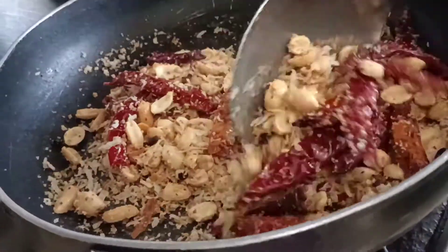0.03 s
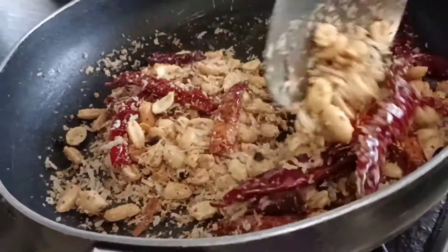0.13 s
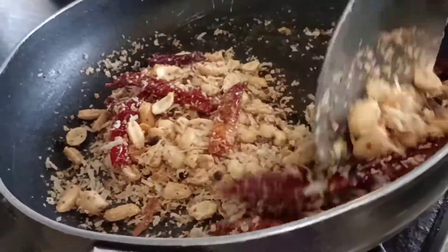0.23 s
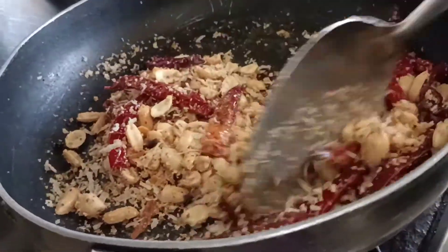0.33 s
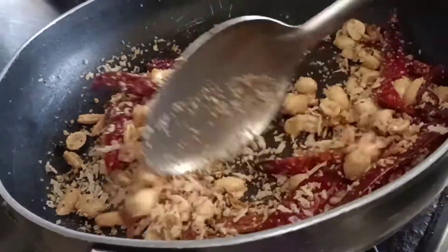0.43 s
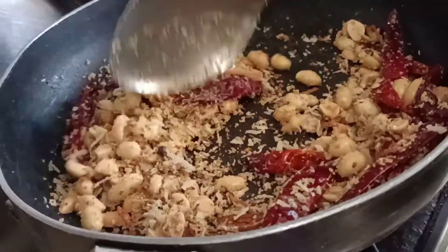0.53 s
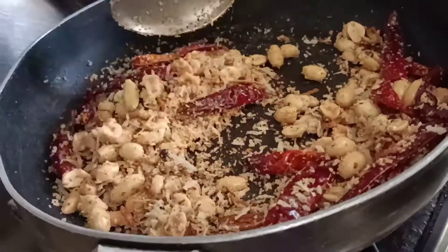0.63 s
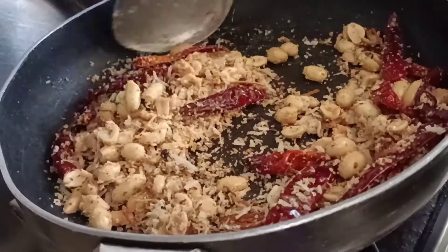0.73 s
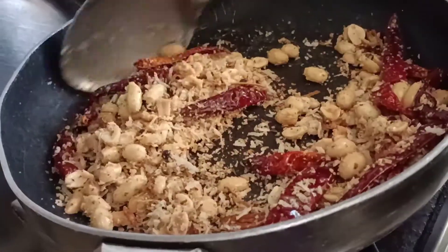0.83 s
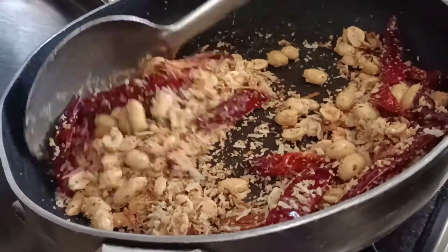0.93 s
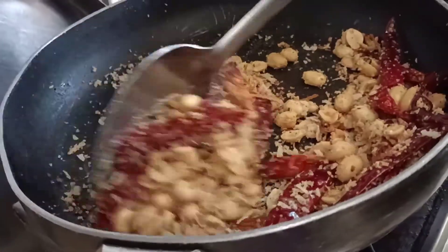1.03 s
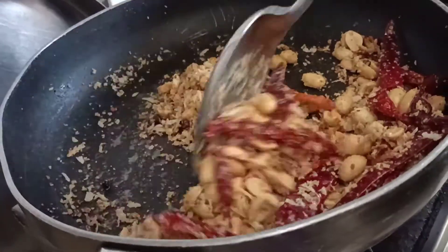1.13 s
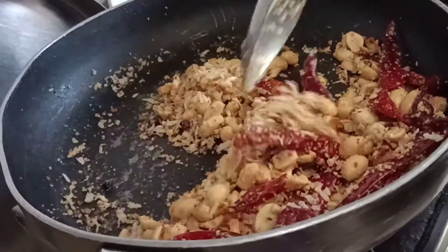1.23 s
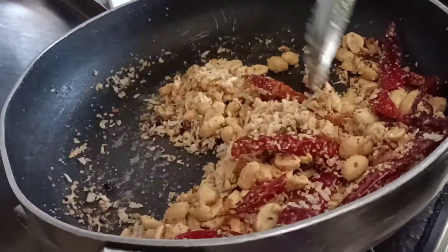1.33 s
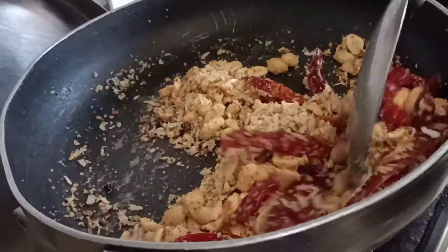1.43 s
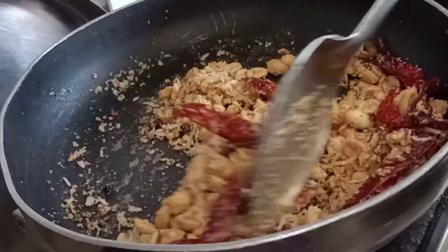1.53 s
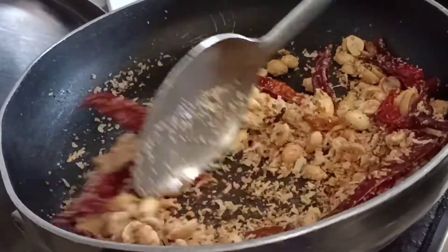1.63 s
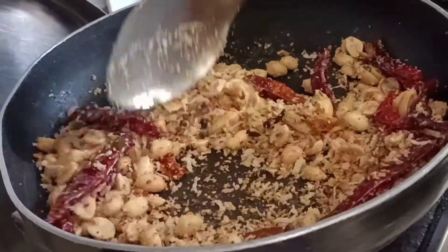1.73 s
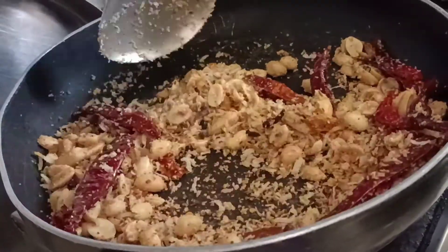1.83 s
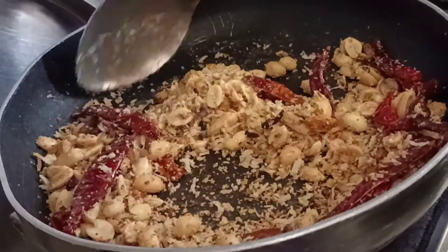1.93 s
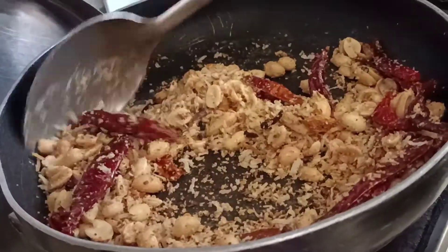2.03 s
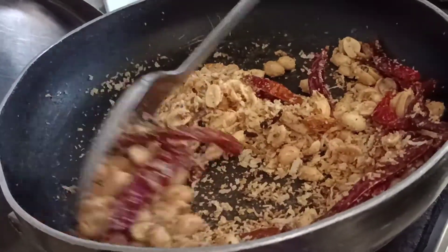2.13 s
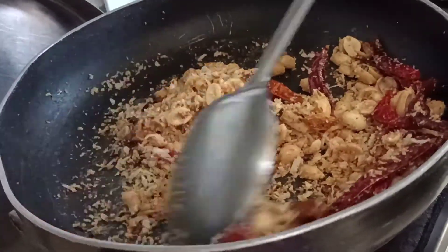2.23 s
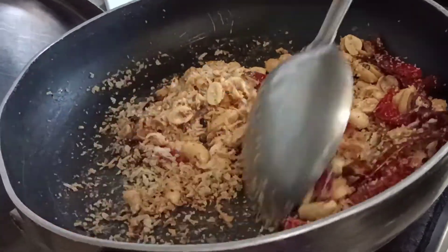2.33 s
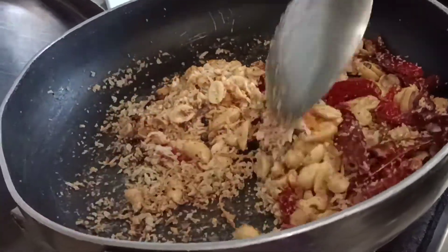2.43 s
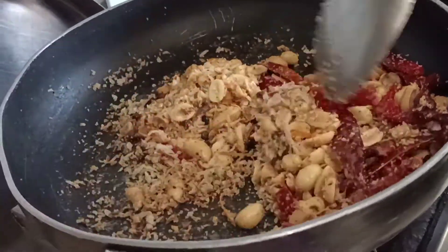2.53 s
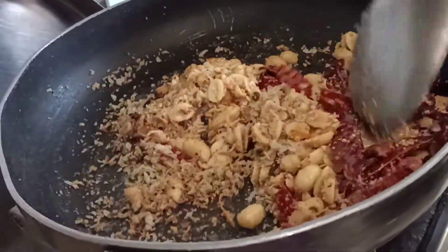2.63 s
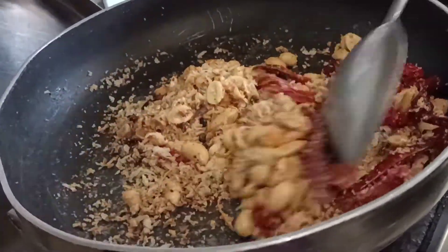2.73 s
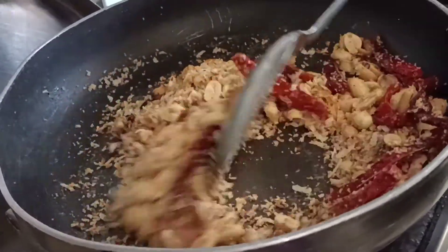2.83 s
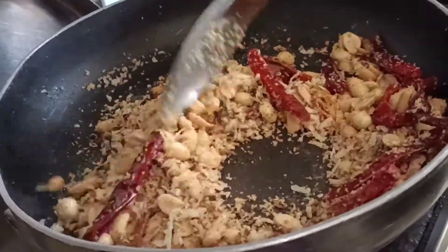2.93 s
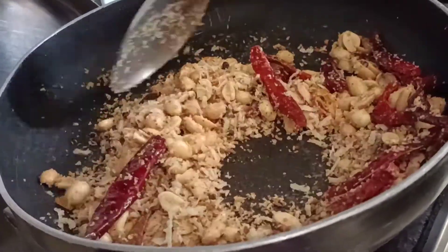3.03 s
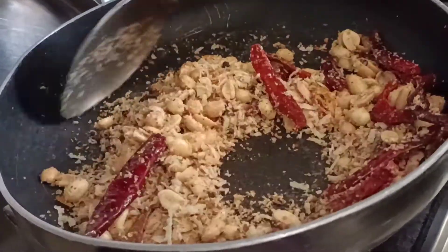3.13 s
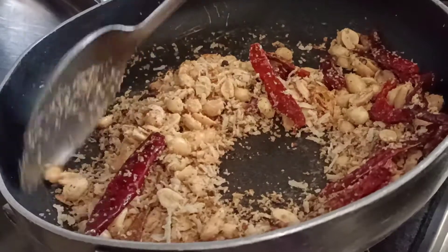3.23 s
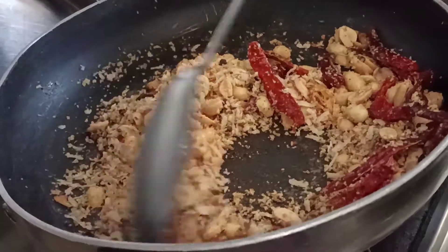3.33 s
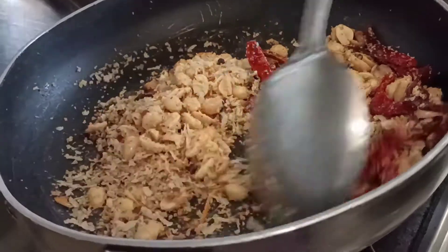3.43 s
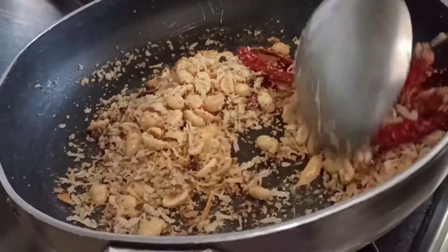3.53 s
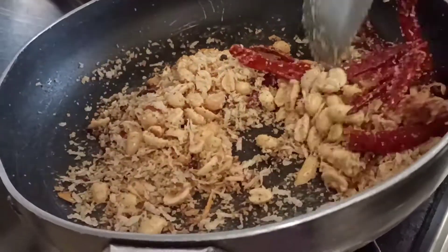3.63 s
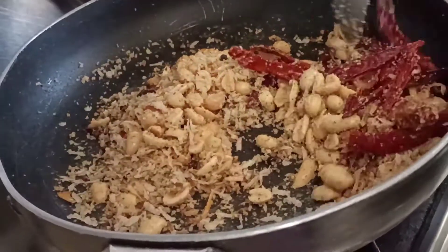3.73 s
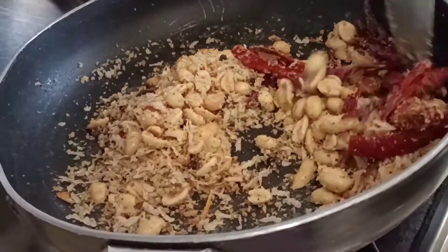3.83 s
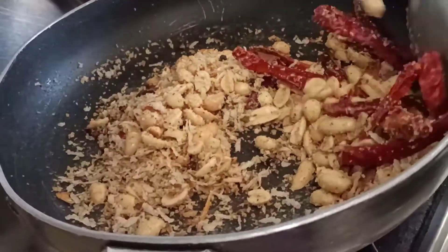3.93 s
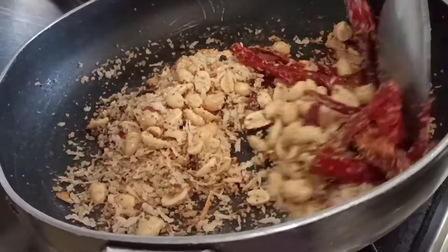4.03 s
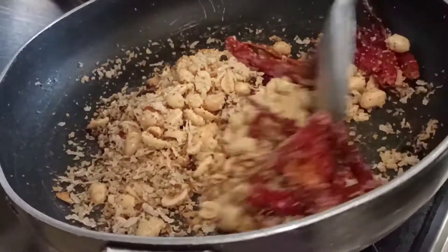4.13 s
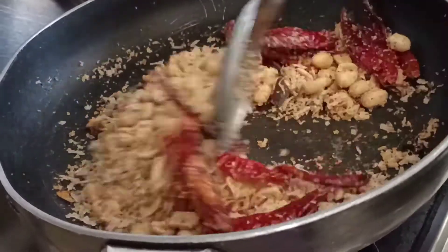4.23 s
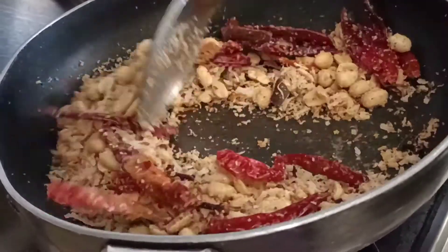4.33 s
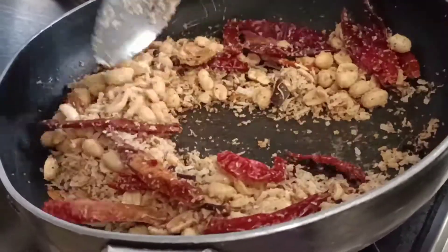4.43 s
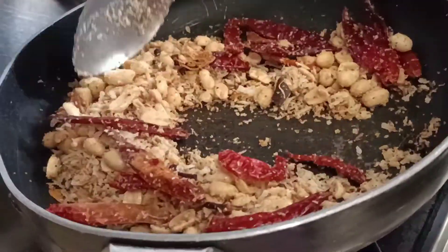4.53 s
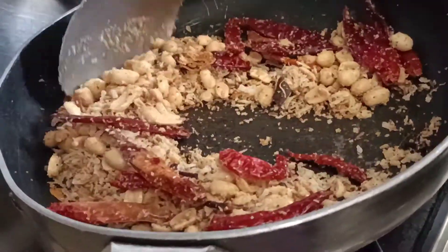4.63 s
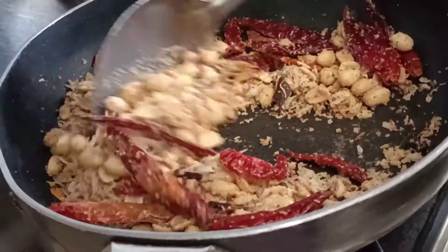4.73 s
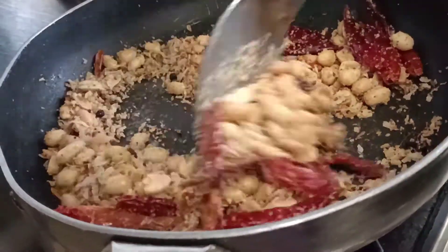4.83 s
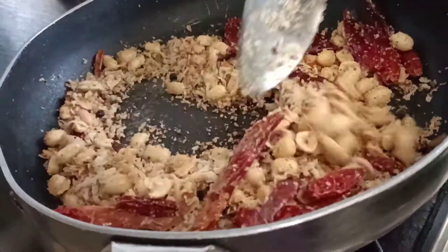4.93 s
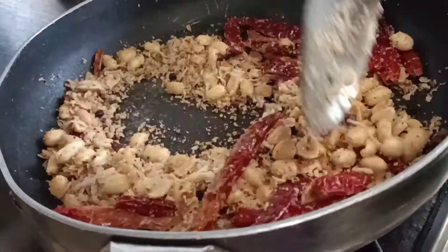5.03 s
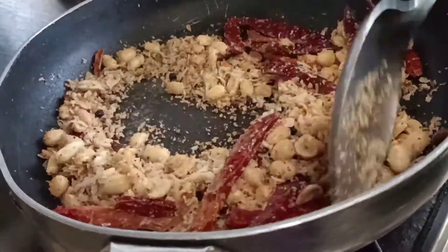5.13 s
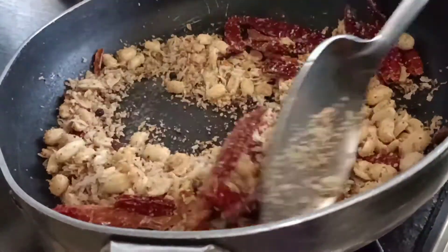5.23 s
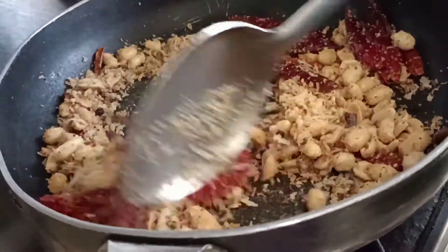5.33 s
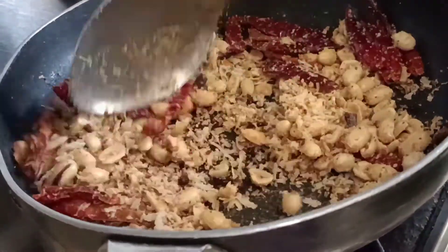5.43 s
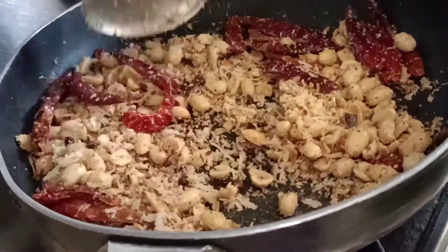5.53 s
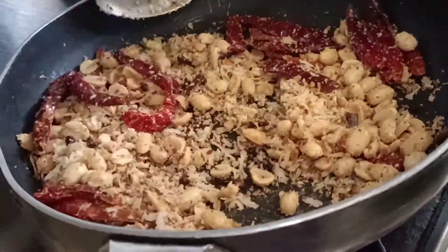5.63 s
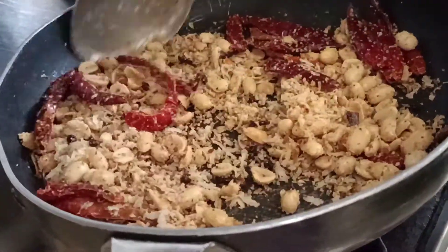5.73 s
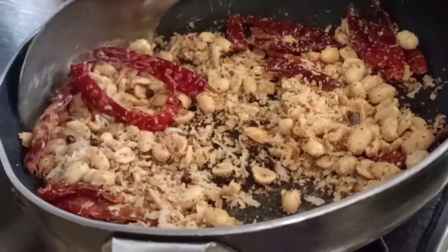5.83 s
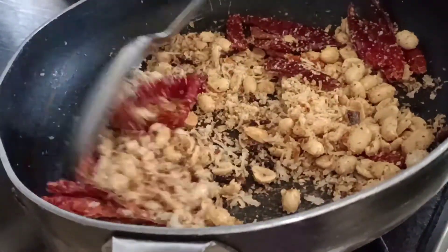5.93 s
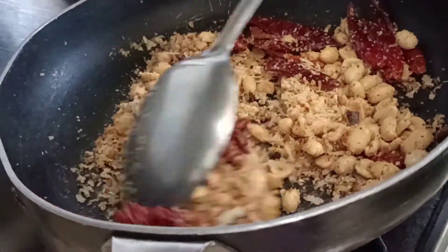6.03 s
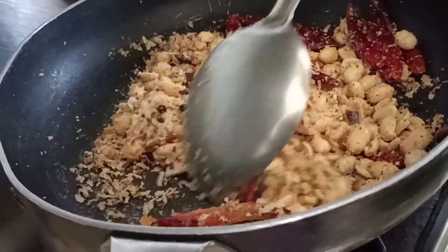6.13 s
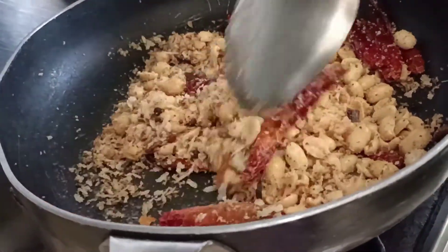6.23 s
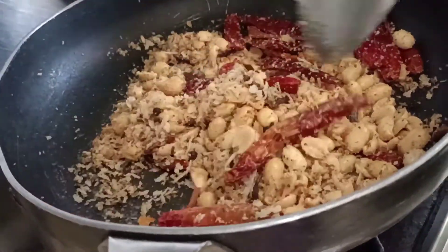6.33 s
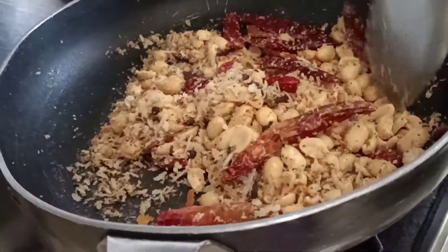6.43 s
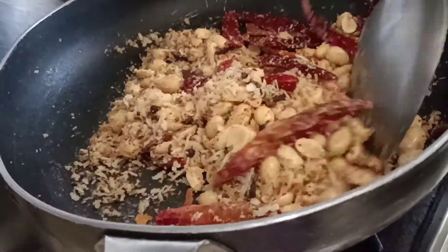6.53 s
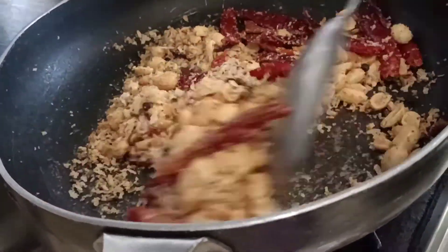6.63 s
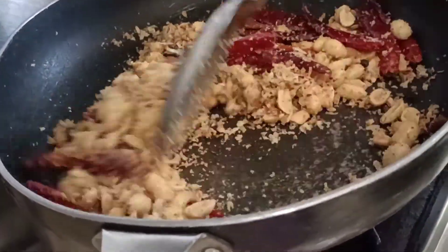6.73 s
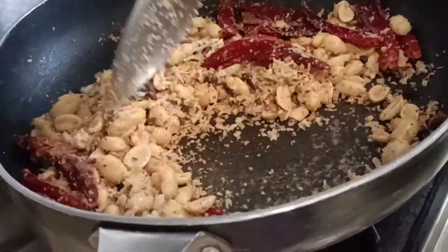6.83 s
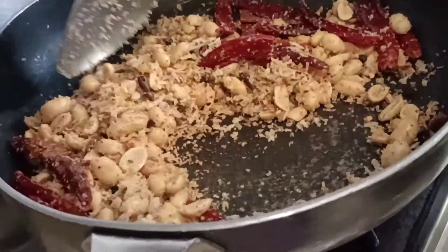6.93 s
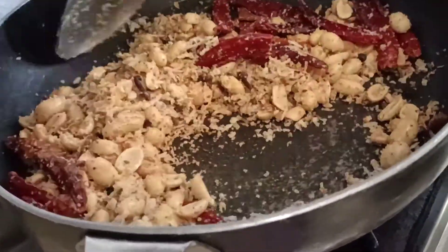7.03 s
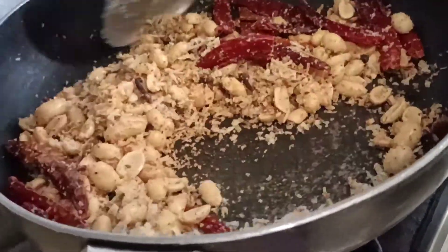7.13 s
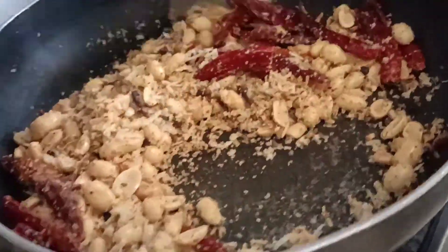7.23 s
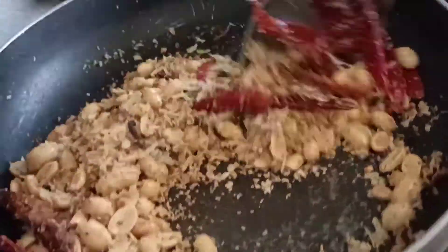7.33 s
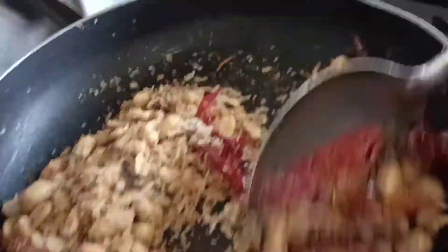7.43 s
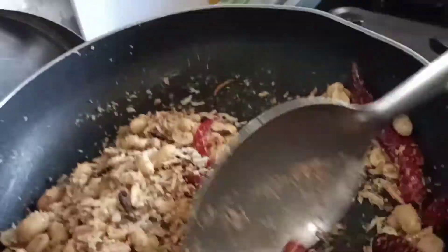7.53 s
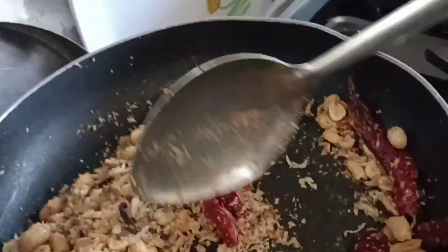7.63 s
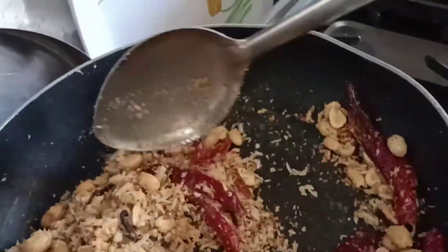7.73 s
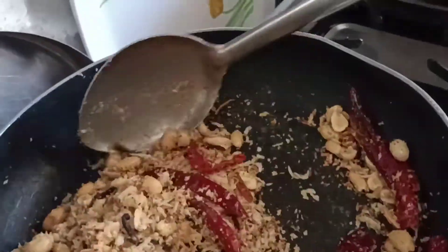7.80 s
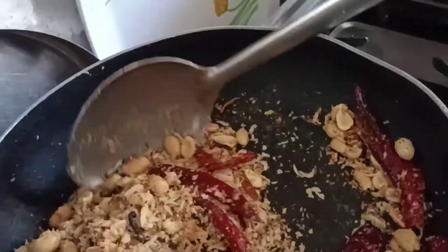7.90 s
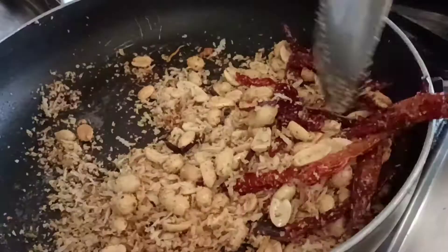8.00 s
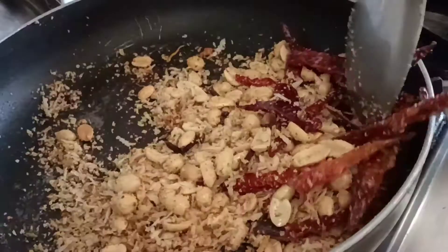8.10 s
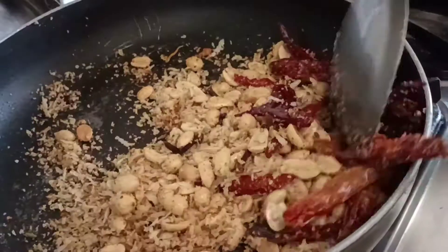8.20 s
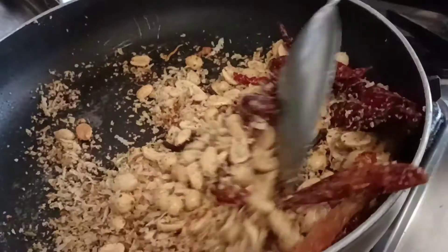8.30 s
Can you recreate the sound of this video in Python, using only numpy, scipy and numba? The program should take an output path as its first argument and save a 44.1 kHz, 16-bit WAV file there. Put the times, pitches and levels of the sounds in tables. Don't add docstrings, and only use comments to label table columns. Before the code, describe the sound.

A steel spoon stirs dry shredded coconut, nuts and crisp chillies in a nonstick pan on a stove. Short rough scrapes and dull metallic clanks alternate with softer rustling pushes and small nut ticks. Strokes are uneven with brief near-quiet gaps; the hardest knocks come around 3.5, 7, 7.7 and 8.3 seconds. Close stereo phone pickup in a small tiled kitchen, short dull reflections, very faint flame hiss.

```python
import sys
import numpy as np
from scipy import signal
from scipy.fft import rfft, irfft, next_fast_len
from scipy.io import wavfile
from scipy.ndimage import uniform_filter1d, minimum_filter1d
from numba import njit

SR = 44100
rng = np.random.default_rng(int(sys.argv[2]) if len(sys.argv) > 2 else 0)


def natural_amplitude(level_db):
    exponent = np.asarray(level_db, float) / 20
    return 10 ** exponent


def master(y):
    cut = np.clip(np.atleast_2d(y).T, -1, 1)
    pcm = np.round(cut * 32767)
    wavfile.write(sys.argv[1], SR, pcm.astype(np.int16))


N = 368889

# (frequency [Hz], level [dB per Hz])
STOVE_SPECTRUM = [(15, -32), (25, 20.5), (59, 4), (192, 28.5), (609, 9), (678, 25.5), (1290, -1),
                  (6450, -11.5), (11600, -9.5), (15200, -3)]
# (frequency [Hz], level [dB per Hz])
FOOD_SPECTRUM = [(35, -51.5), (60, -39.5), (98, 6), (141, -66), (182, 1), (304, -2.5), (430, -6),
                 (484, -17), (881, -19), (2440, -3), (7600, -33), (9800, -28.5), (15200, -38.5)]
# (start [s], level [dB], pan bottom [dB], pan wall [dB], fade [dB per s])
LANDINGS = [(0, -48, 25.5, 1.5, 68), (.752, -41.5, 16.5, 6, 121), (1.153, -46, 25.5, 9, 98),
            (1.323, -34, -20, 7.5, 250), (2.396, -33.5, 22, 8, 232), (3.17, -29, -2, -3, 198),
            (3.523, -18, 1, 1.5, 160), (4.138, -50.5, -7, -16, 202), (4.242, -56, -20, -21, 198),
            (4.962, -50, -14, -23, 260), (4.996, -49, 15.5, -11, 129), (5.108, -30, 7, 6.5, 108),
            (5.535, -36, 0.5, -17, 195), (6.093, -43.5, 5.5, -9, 150), (6.202, -31, -3, -12, 151.5),
            (6.168, -45, 14, 1, 45.5), (3.21, -62, 20, 3, 50.5), (2.75, -57.5, 14, 11.5, 19.5),
            (6.885, -39, 13.5, 6, 72), (6.955, -44, 10, 8, 150), (5.59, -52, 14, 6, 150),
            (6.3, -42, 8, 4, 70), (6.994, -13.5, -19.5, -5, 200), (7.48, -34.5, 16, 7, 115),
            (7.649, -30, 2, 0, 70), (8.305, -21, 9, 4, 145)]
# (start [s], rise [s], hold [s], level [dB], fade [dB per s])
SCRAPES = [(0.086, 0.064, 0.01, -24.5, 204), (0.189, 0.034, 0.115, -28.5, 190),
           (1.194, 0.045, 0.038, -38, 201), (1.315, 0.02, 0.066, -32.5, 90),
           (2.005, 0.077, 0.061, -47.5, 215), (2.303, 0.065, .01, -51.5, 200),
           (2.429, 0.098, 0.13, -29, 147.5), (3.113, 0.03, 0.18, -42.5, 122.5),
           (3.618, 0.087, 0.16, -27, 138), (4.534, 0.14, 0.042, -44, 148),
           (5.112, 0.043, 0.011, -22.5, 238.5), (5.617, 0.036, 0.14, -46.5, 155),
           (6.172, 0.05, 0.057, -31, 77), (6.857, 0.042, 0.066, -43, 186.5),
           (6.992, 0.036, 0.032, -26, 154.5), (7.639, 0.083, 0.11, -22.5, 210.5)]
# (start [s], rise [s], hold [s], level [dB], fade [dB per s])
STIRS = [(0.591, 0.14, 0.12, -37, 116), (1.843, 0.028, 0.12, -43, 109), (1.928, 0.034, 0.13, -37.5, 201),
         (2.28, 0.011, .03, -66, 200), (.5, 0.071, 0.056, -53.5, 100), (2.687, 0.04, 0.18, -41.5, 198.5),
         (2.98, .07, 0.17, -42.5, 115), (4.233, 0.021, 0.4, -41.5, 52.5), (4.449, 0.046, 0.3, -39, 100.5),
         (5.196, 0.061, 0.15, -43, 355), (5.52, 0.04, 0.057, -48, 108), (5.671, 0.065, .075, -39, 200),
         (5.848, .01, .065, -43, 330), (6.692, .04, 0.035, -61.5, 102), (6.845, 0.018, .02, -50, 201),
         (4.285, .025, .02, -41, 200), (4.79, .02, .008, -47, 250), (7.927, 0.041, 0.062, -41.5, 210),
         (8.063, 0.034, 0.048, -36.5, 145), (8.204, 0.04, 0.018, -41.5, 199)]
# (pan bottom [dB], pan wall [dB], grit [dB], metal against food [dB])
SCRAPE_COLOUR = (-7, -0.5, -11, 0)
STIR_COLOUR = (-7, -11, -13.5, -4)
SWELL_POWER = (1.2, 2.3, 1.3, 0.61, 1)
FADE_RATIO = (0.88, 1.065, 1.12, 1.02, 1.04)
# (bottom [Hz], wall [Hz], middle [Hz], grit [Hz])
REGION_HZ = (280, 900, 2600, 9000)
# (frequency [Hz], level [dB], t60 [s])
METAL_MODES = [(193, -5, 0.15), (255, -12, 0.26), (311, 1, 0.14), (391, -7, 0.15), (516, -17, 0.088),
               (674.7, 0, 0.28), (728.8, 2, 0.14), (811, -7, 0.23), (1060, -3.5, 0.025), (1165.5, -6, 0.12),
               (1198, -3, .25), (1290, -6.5, 0.26), (1400, -14, 0.25), (1880, -4, 0.15), (1690, -8, 0.15),
               (2010, -7, 0.15), (1945, 4, 0.052), (2270, -38, 0.11), (2480, -3.5, 0.076),
               (2690, -10, 0.26), (2920, -14, 0.086), (2845, 6, 0.017), (3202, -2, 0.028), (3280, -5, 0.12),
               (3975, 0.5, 0.085), (4200, -11, 0.1), (4550, -41.5, 0.34), (4950, -37, 0.28),
               (5130, -4, 0.067), (5600, -13, 0.1)]
# (time [s], peak [dB], pan bottom [dB], pan wall [dB], contact [s])
KNOCKS = [(0.093, -36, -20, 4, 0.011), (0.172, -23, -47, -30, 0.014), (0.7585, -40.5, -5, -19.5, 0.046),
          (1.149, -41, 11.5, 7, 0.0018), (1.3215, -25, -24, -37, 0.0076), (1.861, -51, -29, -27.5, 0.007),
          (2.3943, -38, 12, 20, 0.015), (3.1749, -34, 1, 4, 0.0015), (3.5237, -17.5, -16, -4, 0.013),
          (4.9931, -46.5, -4, -39, 0.0034), (5.1049, -40, -67, 9.5, 0.0097), (5.1266, -26, -1, -8, 0.0059),
          (5.535, -42, -12, -50, 0.013), (5.6477, -43.5, -15, -3.5, 0.0058),
          (6.093, -59.5, -43, -27, 0.025), (6.1694, -40, 6, -3.5, 0.002), (6.8754, -35, -3, -7, 0.0014),
          (6.996, -15.5, -56, -27.5, 0.0014), (7.479, -53, 11, 26, 0.0015), (7.649, -44, 8, 19.5, 0.0078),
          (7.7385, -10, -42, -7.5, 0.003), (8.096, -32.5, -30, -57, 0.017),
          (8.2349, -46.5, 10.5, -17.5, 0.014), (8.3055, -25.5, 3, -4, 0.014)]
# (frequency [Hz], width [Hz], level [dB])
BOWL_MODES = [(6680, 72, -11.5), (7400, 63, -1.5), (8360, 66, -4), (8540, 70, -3.5), (8980, 43, -3.5),
              (9470, 82, -0.5), (9750, 23, -6.5), (10930, 97, 1), (10100, 59, -5.5), (11100, 66, -11),
              (11600, 73, -11), (12900, 73, -10), (13400, 95, -15.5), (13800, 66, -12.5)]
# (time [s], level [dB])
RIM_TICKS = [
    (1.151, -52),
    (4.961, -54),
    (4.991, -42.5),
    (6.0952, -46.5),
    (7.48, -51),
]
# (time [s], peak [dB], pitch [Hz])
NUT_DROPS = [(0.4524, -35.5, 2070), (1.0217, -75, 2760), (1.0673, -53, 2340), (1.11, -51, 1820),
             (.68, -30, 2500), (1.458, -29, 2880), (5.855, -40, 3000), (1.5904, -34, 2200),
             (2.281, -60, 4200), (2.29, -58, 4400), (2.298, -59, 4000), (2.307, -60, 4300),
             (0.054, -44, 3000), (0.07, -44, 2500), (2.6449, -25, 2410), (2.916, -37, 2640),
             (2.9434, -40, 2690), (3.8931, -21.5, 1280), (3.9294, -30, 1850), (3.993, -36.5, 2870),
             (4.137, -49.5, 2540), (4.2422, -40, 2560), (5.3441, -28, 2480), (5.3942, -37, 5170),
             (7.616, -32, 1820), (7.9862, -29.5, 2870), (8.078, -33, 2630)]
# (time [s], peak [dB], pitch region [Hz])
SNAGS = [(0.109, -14, 2490), (0.135, -12, 1390), (0.154, -9, 2830), (0.175, -8, 2840), (0.249, -13, 1130),
         (0.269, -15, 727), (0.335, -16, 1210), (0.66, -30, 2040), (0.673, -28, 2550), (0.766, -27, 1940),
         (1.197, -27, 703), (1.257, -24, 2480), (1.339, -17, 2460), (1.371, -14, 791), (1.543, -33, 3020),
         (2.141, -31, 2480), (2.393, -10, 657), (2.47, -21, 754), (2.492, -19, 2790), (2.538, -16, 1140),
         (2.564, -15, 1140), (3.646, -20, 657), (3.666, -19, 1130), (3.703, -11, 1120), (3.726, -12, 1140),
         (3.745, -13, 1190), (3.787, -17, 641), (3.872, -18, 1860), (4.809, -41, 2590), (5.124, -10, 746),
         (5.159, -9, 2840), (5.544, -29, 2290), (5.599, -39, 592), (6.208, -16, 2480), (6.22, -18, 813),
         (6.235, -19, 2470), (6.329, -23, 1140), (6.889, -25, 729), (6.961, -25, 799), (7.009, -6, 1940),
         (7.021, -7, 1990), (7.044, -10, 1890), (7.494, -15, 689), (7.65, -17, 662), (7.662, -13, 681),
         (7.685, -8, 1870), (7.739, -4, 4030), (7.767, -5, 713), (7.799, -10, 4050), (8.024, -32, 1940),
         (8.098, -25, 2470), (8.121, -25, 2460), (8.186, -33, 1920), (8.241, -31, 3340), (8.306, -5, 1900),
         (8.321, -8, 1890), (8.354, -13, 1350)]
# (time [s], length [s], pitch [Hz], level [dB])
SONGS = [(0.148, 0.038, 2850, -28), (0.167, 0.091, 1897, -28), (0.928, 0.065, 696, -62),
         (1.322, 0.012, 2850, -28), (2.519, 0.057, 1060, -36), (2.52, 0.079, 1116, -31),
         (2.528, 0.041, 651, -33), (3.534, 0.034, 678, -31), (3.684, 0.064, 1112, -29),
         (3.656, 0.157, 682, -37.5), (4.63, 0.08, 1110, -59), (4.959, 0.023, 2480, -46),
         (4.961, 0.053, 4560, -61), (5.152, 0.068, 682, -35.5), (5.659, .12, 683, -43),
         (5.653, 0.057, 1124, -50.5), (6.095, 0.061, 1104, -50.5), (6.271, 0.073, 1094, -40.5),
         (6.853, 0.005, 2500, -38), (6.998, .04, 4000, -29.5), (6.999, 0.034, 5200, -33.5),
         (7.738, 0.008, 4000, -22.5), (7.798, 0.06, 4050, -32), (8.306, 0.043, 1941, -18),
         (0.191, .15, 685, -39), (0.252, 0.086, 1250, -38), (7.68, .03, 1850, -21),
         (4.99, 0.016, 3350, -57), (7.11, .04, 1250, -40), (.66, .04, 2550, -42), (1.152, .03, 720, -41),
         (1.25, .03, 4200, -52), (1.35, .03, 4050, -45), (1.365, .02, 2480, -36), (1.42, .05, 1950, -40),
         (2.398, .025, 700, -28), (2.495, .04, 2800, -36), (2.61, .03, 1950, -38), (4.62, .12, 700, -55),
         (6.168, .02, 2800, -40), (6.215, .025, 1950, -38), (6.28, .025, 2800, -38), (6.31, .03, 1150, -41),
         (7.57, .04, 2480, -46), (7.7, .06, 2900, -28), (7.755, .04, 700, -31), (8.1, .04, 2450, -40),
         (8.24, .03, 1950, -46), (8.306, .025, 3300, -30)]
# (frequency [Hz], left minus right [dB])
PORT_TILT = [(60, -2), (400, 0.5), (800, -1), (1500, 1), (4500, 4.5), (6000, 1), (7500, -8), (10000, -18),
             (13000, -3.5)]


def filtered(x, order, hz, kind="low"):
    return signal.sosfilt(signal.butter(order, hz, kind, fs=SR, output="sos"), x)


def colour(x, points, share=0.69, lag_s=0.):
    size = next_fast_len(N)
    hz = np.fft.rfftfreq(size, 1 / SR) + 1
    p = np.array(points)
    level_db = np.interp(np.log(hz), np.log(p[:, 0] + 1), p[:, 1])
    gain = natural_amplitude(share * level_db) * np.exp(-2j * np.pi * hz * lag_s)
    return irfft(rfft(x, size) * gain, size)[..., :N]


def unit(x):
    return x / np.sqrt(np.mean(x ** 2))


def walk(rate):
    return np.interp(np.arange(N) * rate / SR, np.arange(900), rng.standard_normal(900))


def grains(per_s, spread_db):
    hit = rng.random(N) < per_s / SR
    size_db = spread_db * np.minimum(rng.exponential(size=N), 3.5)
    return unit(hit * rng.standard_normal(N) * natural_amplitude(size_db))


@njit
def ring(x, hz, fade):
    z, out = 0j, np.empty(len(x), np.complex128)
    for i in range(len(x)):
        if i % 32 == 0:
            p = fade * np.exp(2j * np.pi * hz[i] / SR)
        z = z * p + x[i]
        out[i] = z
    return out


def stove():
    same = rng.standard_normal(N)
    apart = filtered(rng.standard_normal((2, N)), 1, 500, "high")
    return unit(colour(1.3 * same + apart, STOVE_SPECTRUM)) * natural_amplitude(-68 + 0.59 * walk(17.0))


def rumble(drag_db):
    rock_hz, rock_db, follow = 91, -42, 0.6
    hum_hz, hum_db = 104, -74
    push_db = uniform_filter1d(drag_db + 48, size=3000)
    noise = rng.standard_normal(N) + .2 * rng.standard_normal((2, N))
    rock = filtered(noise, 2, [0.9 * rock_hz, 1.4 * rock_hz], "band")
    rock = filtered(rock, 2, 1.7 * rock_hz)
    hum = filtered(rng.standard_normal(N), 2, [hum_hz / 1.12, hum_hz * 1.12], "band")
    thud = unit(rock) * natural_amplitude(rock_db - 20.5 + follow * push_db + 1.5 * walk(13))
    return thud + unit(hum) * natural_amplitude(hum_db)


def effort(t, s, rise, hold, db, fade):
    sag_db_per_s, steepen_per_s = 32.5, 0.41
    t = t - s
    swell = np.clip(t / max(rise, .002), 0, 1) ** np.array(SWELL_POWER)[:, None]
    held = np.clip(t - rise, 0, hold)
    after = np.clip(t - rise - hold, 0, 1)
    fall_db = fade * after * (1 + steepen_per_s * after) * np.array(FADE_RATIO)[:, None]
    return (swell * natural_amplitude(db - sag_db_per_s * held - fall_db)) ** 2


def controls():
    moves = [(row, SCRAPE_COLOUR) for row in SCRAPES] + [(row, STIR_COLOUR) for row in STIRS]
    for s, db, low, wall, fade in LANDINGS:
        grit = -18.5 - 0.28 * (db + 38) + 0.46 * low
        moves.append(((s, 0.0025, 0, db, fade), (low, wall, grit, -4)))
    t = np.arange(0, N, 32) / SR
    power = sum(natural_amplitude([0, *tone])[:, None] ** 2 * effort(t, *row) for row, tone in moves)
    db = 10 * np.log10(natural_amplitude(-93.5) ** 2 + power)
    return [np.interp(np.arange(N) / SR, t, row) for row in (db[0], *(db[1:] - db[0]))]


def patchy(x):
    edges = (60 * 2 ** np.arange(0, 8.3, .25))[8:]
    out = filtered(x, 2, edges[0])
    for band in zip(edges[:-1], edges[1:]):
        out = out + filtered(x, 2, band, "band") * natural_amplitude(2.5 * walk(30))
    return out


def nuts():
    out = np.zeros((2, N))
    for hz in 700 * 2 ** np.arange(0, 3.1, .2):
        fade = np.exp(-np.pi * hz * .06 / SR)
        ping = np.imag(ring(grains(160, 2.0), hz * (1 + .04 * walk(40)), fade)) * natural_amplitude(3 * walk(12))
        place_db = 3.5 * walk(30)
        out += unit(ping) * np.sqrt(hz) * natural_amplitude([place_db, -place_db])
    return unit(out)


def food(drag_db, low_db, wall_db, grit_db):
    tumble = grains(5000, 0.64) * natural_amplitude(2.0 * walk(32))
    spread = np.array([grains(5000, 2.7), grains(5000, 0.6)]) * natural_amplitude(2.0 * walk(16))
    spread = filtered(spread, 1, 700, "high")
    full = unit(colour(patchy(tumble + 2.54 * spread) + 0.48 * nuts(), FOOD_SPECTRUM))
    bottom = filtered(full, 3, 550) * natural_amplitude(drag_db + low_db - 3.0)
    wall = filtered(full, 3, (550, 1400), "band") * natural_amplitude(drag_db + wall_db + 10)
    middle = filtered(full, 3, (1400, 6000), "band") * natural_amplitude(drag_db)
    grit = filtered(full, 3, 6000, "high") * natural_amplitude(drag_db + grit_db + 7.5)
    return bottom + wall + middle + grit


def by_band(hz, low_db, wall_db, grit_db):
    w = [np.interp(np.log(hz), np.log(REGION_HZ), row) for row in np.eye(len(REGION_HZ))]
    return w[0] * low_db + w[1] * wall_db + w[3] * grit_db


def contact(seconds):
    t = np.arange(3000) / SR
    chatter = rng.standard_normal((len(seconds), len(t)))
    force = chatter * np.exp(-t / np.clip(seconds, .0004, .03)[:, None])
    return force / np.sqrt(np.sum(force ** 2, axis=1, keepdims=True))


def metal(drag_db, low_db, wall_db, grit_db, touch_db):
    slip = grains(900, 3.34) * natural_amplitude(1.24 * walk(35))
    s, peak_db, knock_low, knock_wall, seconds = np.transpose(KNOCKS)
    force, at = contact(seconds), (s * SR).astype(int)
    out = np.zeros((2, N))
    for hz, db, t60 in METAL_MODES:
        drive = np.zeros(N + force.shape[1])
        slip_db = drag_db + touch_db + by_band(hz, low_db, wall_db, grit_db)
        drive[:N] = slip * natural_amplitude(slip_db + 2.5 * walk(4.5) + 2.0 * walk(18))
        spot_db = 2 * rng.standard_normal(len(s))
        knock_db = peak_db + by_band(hz, knock_low, knock_wall, -19) + spot_db + 34.5
        for i, f in zip(at, force * natural_amplitude(knock_db)[:, None]):
            drive[i:i + len(f)] += f
        fade = np.exp(-np.log(1000) / (min(t60, .2) * SR))
        z = ring(drive[:N], hz * (1 + 0.011 * walk(12)), fade) * np.sqrt(1 - fade ** 2) * natural_amplitude(db - 7.5)
        pattern = min(hz / 2500, 1)
        turn, lean_db = walk(3.7) * pattern, walk(2.6) * pattern
        out[0] += np.imag(z * np.exp(.7j * turn)) * natural_amplitude(2 * lean_db)
        out[1] += np.imag(z) * natural_amplitude(-2 * lean_db)
    return filtered(out, 2, 7000)


def spoon(level_db):
    drive = grains(1600, 2.8) * natural_amplitude(level_db - 2)
    for s, db in RIM_TICKS:
        drive[int(s * SR)] += natural_amplitude(db + 30)
    out = 0
    for hz, width, db in BOWL_MODES:
        fade = np.exp(-np.pi * width * .6 / SR)
        z = ring(drive * natural_amplitude(5.3 * walk(16)), hz * (1 + .003 * walk(9)), fade) * np.sqrt(1 - fade ** 2)
        out = out + natural_amplitude(0.78 * db - 9) * np.imag([z * np.exp(1j * hz), z])
    return out


def drops():
    out, t = np.zeros(N), np.arange(1500) / SR
    rise = np.minimum(t / .0006, 1)
    for s, db, hz in NUT_DROPS:
        ping = np.sin(2 * np.pi * hz * t) * np.exp(-t / .004)
        hiss = 2 * rng.standard_normal(len(t)) * np.exp(-t / .002)
        tick = filtered(rise * (ping + hiss), 4, [hz / 1.6, min(hz * 1.5, 5500)], "band")
        start = int(s * SR)
        out[start:start + len(t)] += natural_amplitude(db - 1) * tick
    return out


def snags():
    level_db, octaves, ring_share, crack_db, crack_s = -6.5, .3, .25, -5, .0012
    out, t = np.zeros((2, N + 3000)), np.arange(3000) / SR
    modes_hz, _, t60 = np.transpose(METAL_MODES)[:, :, None]
    decay = np.log(1000) / (ring_share * np.clip(t60, .05, .25))
    rings = np.exp((2j * np.pi * modes_hz - decay) * t)
    for s, db, hz in SNAGS:
        spot, turn = rng.standard_normal((2, len(METAL_MODES)))
        nearness = np.exp(-(np.log2(modes_hz[:, 0] / hz) / octaves) ** 2)
        weight = nearness * natural_amplitude(4 * spot)
        both = np.array([weight * np.exp(.5j * turn), weight]) / np.sqrt(np.sum(weight ** 2))
        catch = np.imag(both @ rings)
        crack = rng.standard_normal(400) * np.exp(-t[:400] / crack_s)
        crack = filtered(crack, 2, [hz / 2, min(hz * 2, 6000)], "band")
        catch[:, :400] += natural_amplitude(crack_db + 6) * crack
        start = int(s * SR)
        out[:, start:start + len(t)] += natural_amplitude(db + level_db) * catch
    return out[:, :N]


def singing():
    out, t = np.zeros(N), np.arange(N) / SR
    for s, length, hz, db in SONGS:
        on = slice(int(s * SR), int((s + length + .15) * SR))
        swell = np.clip((t[on] - s) / 0.0023, 0, 1)
        swell = swell * np.exp(-np.clip(t[on] - s - length, 0, 1) / 0.016)
        phase = 2 * np.pi * np.cumsum(hz * (1 + 0.012 * walk(60)[on])) / SR
        out[on] += natural_amplitude(db + 4.5 + 4 * walk(110)[on]) * swell * np.sin(phase)
    return out


def kitchen(x):
    t60_s, level_db, top_hz = 0.18, -13.5, 5490
    t = np.arange(SR // 2) / SR
    tail = rng.standard_normal((2, len(t))) * np.exp(-np.log(1000) * t / t60_s) * (t > .004)
    tail = filtered(tail, 2, [500, top_hz], "band")
    tail = tail / np.sqrt(np.sum(tail ** 2, axis=1, keepdims=True))
    return signal.fftconvolve(x.mean(axis=0)[None], tail, axes=1)[:, :N] * natural_amplitude(level_db)


def scene():
    drag_db, low_db, wall_db, grit_db, touch_db = controls()
    touch_db = np.maximum(touch_db, 4 + .3 * drag_db)
    pan = food(drag_db, low_db, wall_db, grit_db)
    pan = pan + metal(drag_db, low_db, wall_db, grit_db, touch_db)
    pan = pan + spoon(drag_db + grit_db - 6) + snags() + singing()
    pan = filtered(pan, 4, 160, "high")
    late_left = colour(pan[0], [(1, 0), (2, 0)], 0, 10 / SR)
    near = np.array([late_left, pan[1]]) + kitchen(pan)
    near = near + drops()
    ports = np.array([colour(near[0], PORT_TILT, 1 / 2), colour(near[1], PORT_TILT, -1 / 2)])
    return ports + rumble(drag_db + low_db) + stove()


def top_cut(x):
    return signal.sosfilt(signal.butter(12, 15100, fs=SR, output="sos"), x)


def record(dry):
    safe_gain = np.minimum(1, .99 / (np.abs(dry).max(axis=0) + 1e-9))
    gain = uniform_filter1d(minimum_filter1d(safe_gain, size=401), size=201)
    return top_cut(dry * gain)


dry = scene()
out = record(dry)
master(out)
```